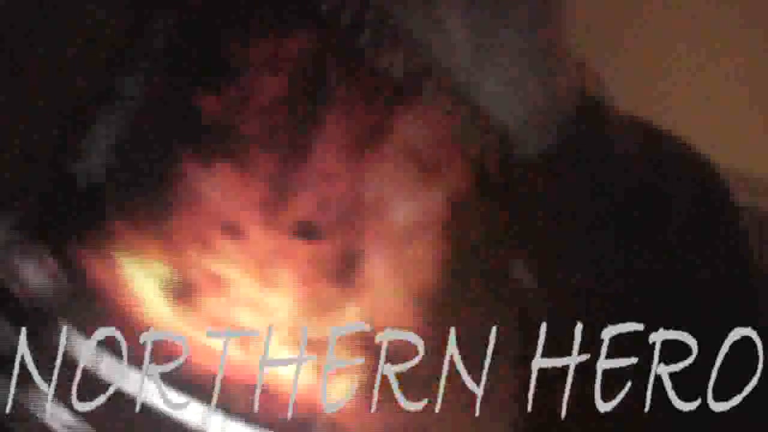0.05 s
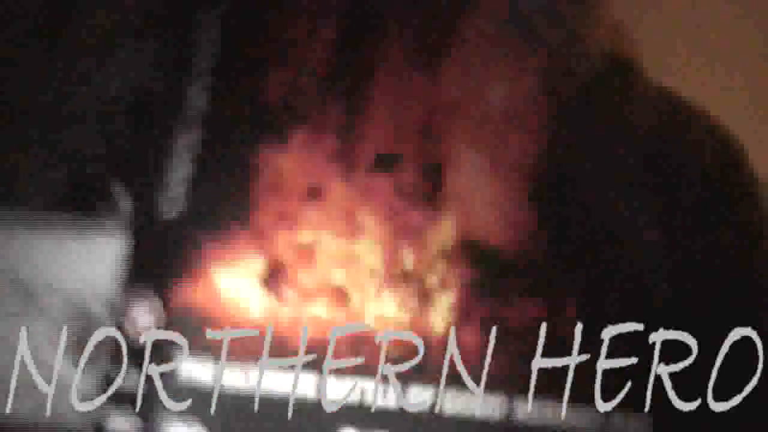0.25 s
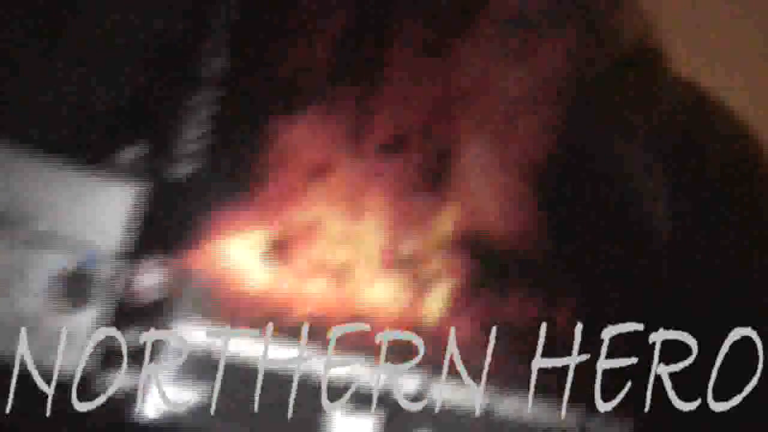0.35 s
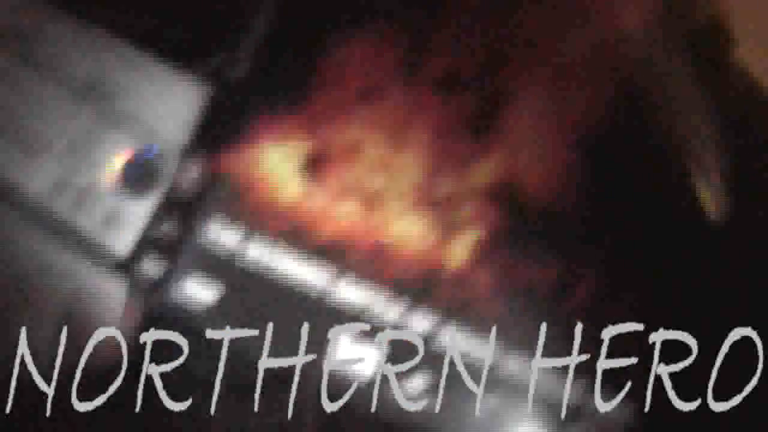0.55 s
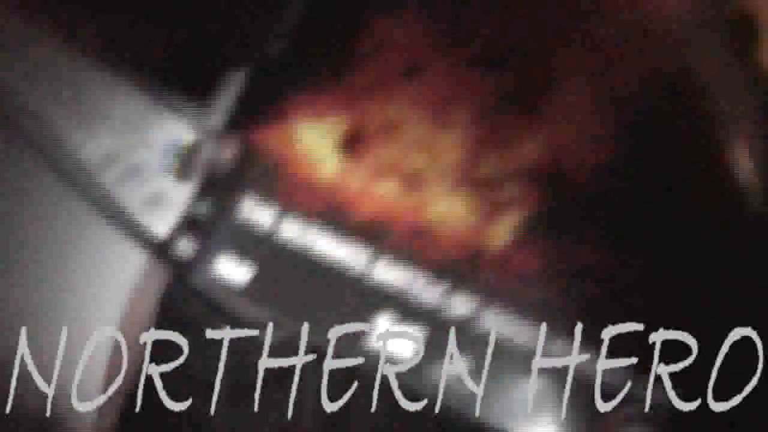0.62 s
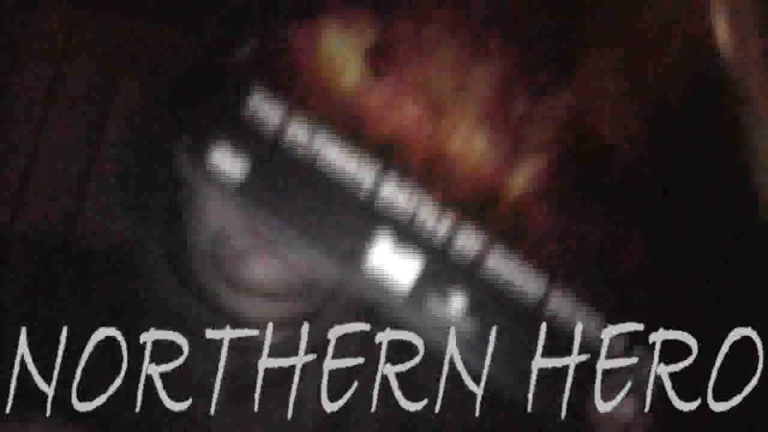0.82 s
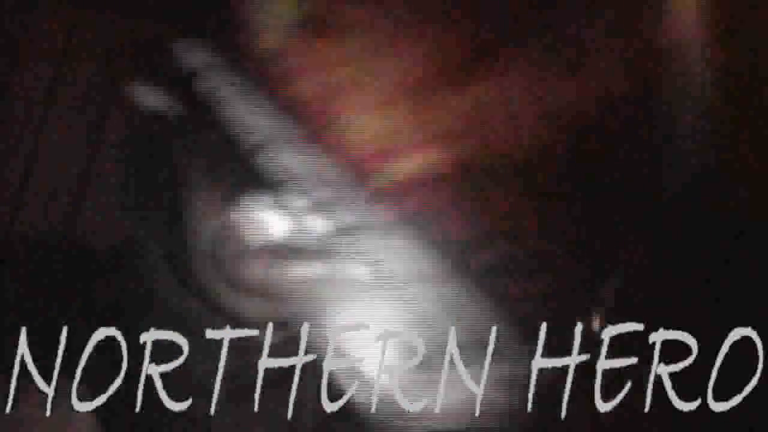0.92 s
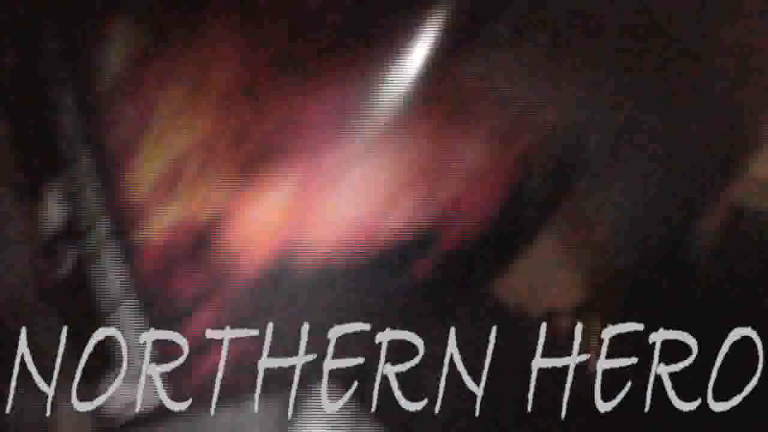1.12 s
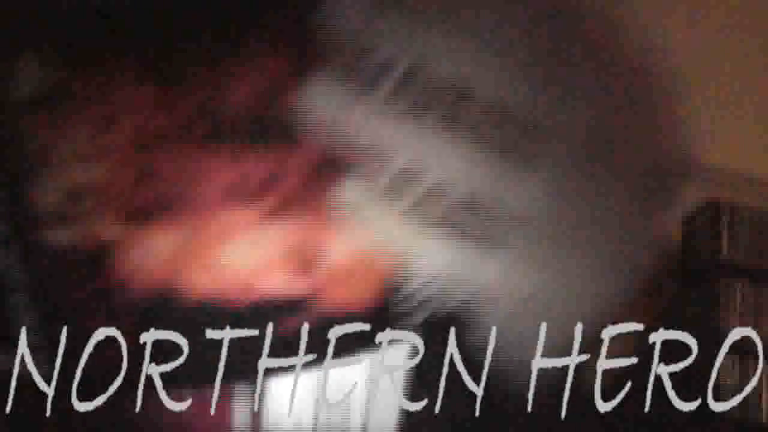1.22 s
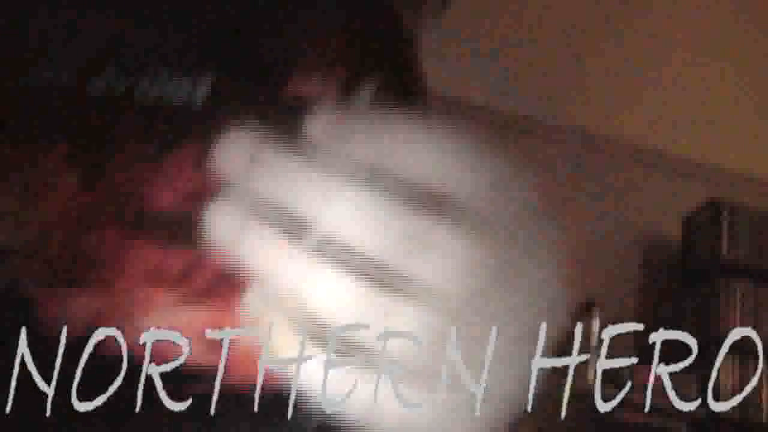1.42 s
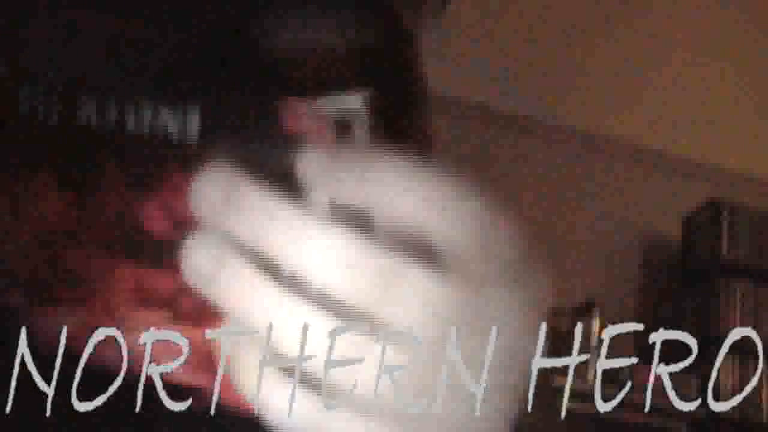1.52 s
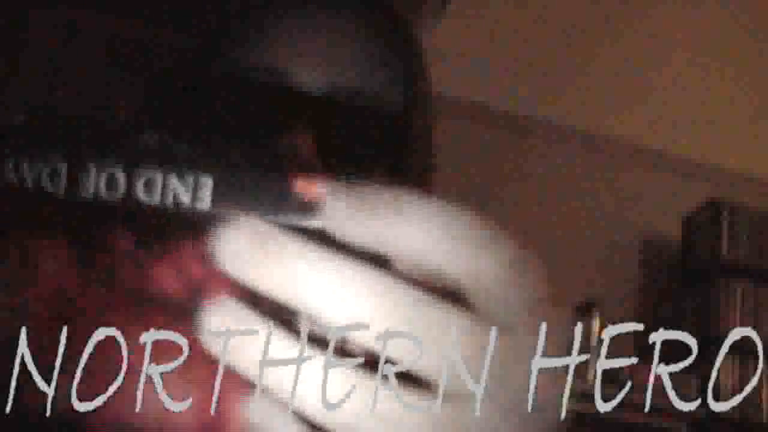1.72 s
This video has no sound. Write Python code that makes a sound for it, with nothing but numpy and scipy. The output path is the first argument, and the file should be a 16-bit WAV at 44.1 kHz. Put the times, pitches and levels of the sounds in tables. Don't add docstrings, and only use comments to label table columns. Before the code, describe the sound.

After a short faint hush, stiff printed paper snaps at its edge and rips in a dense, fluttering crackle; it stops abruptly, and fingers then lightly rub, crease and tap the torn pieces, recorded close indoors.

```python
import sys
import numpy as np
from scipy import signal
from scipy.fft import rfft, irfft, next_fast_len
from scipy.io import wavfile
from scipy.ndimage import uniform_filter1d, map_coordinates

SR = 44100
rng = np.random.default_rng(int(sys.argv[2]) if len(sys.argv) > 2 else 0)


def invert_db(level):
    return 10 ** (np.asarray(level, dtype=float) / 20)


def put_to_file(sound):
    columns = np.atleast_2d(sound).T
    safe = np.clip(columns, -1, 1)
    whole_steps = np.round(safe * 32767)
    wavfile.write(sys.argv[1], SR, whole_steps.astype(np.int16))


N = 77175


def unit(x):
    return x / np.sqrt(np.mean(x ** 2) + 1e-20)


def along(points, hz):
    f, v = np.transpose(points)
    return np.interp(np.log(hz + 1), np.log(f + 1), v)


def wobble(rate):
    knots = rng.standard_normal(int(N / SR * 400) + 4)
    return map_coordinates(knots, [np.arange(N) * min(rate, 399) / SR])


def filtered(x, response):
    m = next_fast_len(len(x) + 8192)
    return irfft(rfft(x, m) * response(np.fft.rfftfreq(m, 1 / SR)), m)[..., :len(x)]


def colour(x, points):
    def response(hz):
        cepstrum = irfft(np.log(invert_db(along(points, hz)) + 1e-6))
        half = len(cepstrum) // 2
        cepstrum[1:half] *= 2
        cepstrum[half + 1:] = 0
        return np.exp(rfft(cepstrum))
    return filtered(x, response)


def band(hz, centre_hz, width):
    return np.exp(-.5 * (np.log((hz + 1) / centre_hz) / width) ** 2)


def ring(x, centre_hz, width_hz):
    def response(f):
        damping = 1j * f * width_hz
        return damping / (centre_hz ** 2 - f * f + damping)
    return filtered(x, response)


def stroke(start, length, edge):
    u = (np.arange(N) / SR - start) / length
    return np.clip(u / edge, 0, 1) * np.clip((1 - u) / 0.058, 0, 1)


def crackle(per_s, spread_db, hiss_db):
    chance, sign, size = rng.random((3, N))
    size_db = np.minimum(-spread_db * np.log(1 - size), 12)
    breaks = (chance < per_s / SR) * np.sign(sign - .5) * invert_db(size_db)
    return unit(unit(breaks) + invert_db(hiss_db) * rng.standard_normal(N))


def rip():
    # time in seconds, pull level in dB.
    pull = [
        (.236, -32.5),
        (.29, -16.5),
        (.35, -20.5),
        (.43, -15.5),
        (.57, -17),
        (.65, -15.5),
        (.72, -16.5),
        (.865, -15),
        (.922, -20),
    ]
    # start in seconds, length in seconds, drop in dB.
    stalls = [
        (.357, .005, 7),
        (.379, .0065, 12),
        (.401, .0075, 13),
        (.694, .012, 4),
        (.847, .004, 7),
    ]
    # centre time in seconds, spread in seconds, strip resonance in Hz, lift in dB.
    flutters = [(0.297, 0.032, 7350, 13.5), (0.306, 0.011, 5150, 9), (0.301, 0.017, 2450, 7.5),
                (0.343, 0.013, 6190, 4), (.34, 0.0075, 3020, 9), (.37, .008, 1650, 1.5),
                (.43, 0.044, 6570, 10), (0.441, 0.016, 1770, 6.5), (.47, .014, 6820, -0.5),
                (.49, 0.047, 3460, 7.5), (.515, 0.016, 1320, 11.5), (0.521, .012, 4750, 8.5),
                (.535, 0.014, 6780, 12.5), (0.556, .018, 3625, 6.5), (.58, 0.0111, 6660, 9),
                (0.619, 0.07, 3570, 7.5), (.625, 0.059, 4560, 6.5), (0.629, 0.016, 7480, 11),
                (0.657, 0.026, 6310, 13.5), (.67, 0.008, 3850, 5), (0.727, 0.016, 4420, 9),
                (.738, 0.02, 3220, 5.5), (.752, 0.012, 5840, 10), (.77, 0.038, 7340, 5.5),
                (.8, 0.03, 1340, 9), (.81, 0.012, 5900, 2.5), (0.831, 0.075, 7230, 6.5),
                (0.853, 0.037, 5200, 9.5), (0.867, 0.0029, 3300, 13.5), (.9, .014, 6100, 11),
                (.912, 0.0072, 4200, 10), (.88, 0.046, 1080, 2.5)]
    # time in seconds, boom of the bent sheet in dB.
    bend = [
        (0.249, -1),
        (.33, 8),
        (.43, 3.5),
        (.52, 5.5),
        (.59, 9),
        (.65, 9.5),
        (0.719, 5),
        (.79, 3.5),
        (.855, -2),
        (.92, 2.5),
    ]
    hz, t, z = signal.stft(fibres(), SR, nperseg=256)
    hz = hz[:, None]
    bend_s, boom_db = np.transpose(bend)
    lift_db = np.interp(t, bend_s, boom_db) / (1 + (hz / 2400) ** 4)
    for at, spread, ring_hz, db in flutters:
        width = .075 * (6000 / ring_hz) ** .5
        lift_db = lift_db + db * band(hz, ring_hz, width) * np.exp(-.5 * ((t - at) / spread) ** 2)
    patches = uniform_filter1d(rng.standard_normal(z.shape), size=5, axis=0)
    patches = 2.2 * unit(uniform_filter1d(patches, size=16, axis=1))
    z = z * invert_db(lift_db + patches)
    slow = np.sqrt(uniform_filter1d(np.sum(abs(z) ** 2, 0), size=9) + 1e-20)
    x = unit(signal.istft(z / slow, SR, nperseg=256)[1][:N])

    t = np.arange(N) / SR
    pull_s, pull_db = np.transpose(pull)
    level_db = np.interp(t, pull_s, pull_db) + 1.6 * wobble(260)
    ease_s, release_s = .004, .045
    for start, length, drop_db in stalls:
        level_db = level_db - drop_db * np.clip((t - start + ease_s) / ease_s, 0, 1) * (t < start + length)
    release = invert_db(-60 * np.clip(t - pull_s[-1], 0, 1) / release_s)
    return x * invert_db(level_db) * (t > pull_s[0]) * release


def fibres():
    # frequency in Hz, fibre spectrum in dB per Hz.
    fibre_spectrum = [(35, -49.5), (60, -33.5), (156, -31.5), (354, -11.5), (501, -13), (1240, -5),
                      (2430, -2), (6300, -0.5), (10600, -13), (13800, -60.5), (22000, -120)]
    grain_hz = [1500, 3700, 6800]

    def breaks():
        return crackle(3600 / 2, 4.5, -7)

    def share(f, hz):
        return band(f, hz, 0.4) / (sum(band(f, h, 0.42) for h in grain_hz) + 1e-30)

    apart = sum(filtered(breaks(), lambda f: np.sqrt(share(f + 300, hz))) for hz in grain_hz)
    return colour(apart + 1.35 * breaks(), fibre_spectrum)


def snaps():
    # start in seconds, peak in dB, low part in dB, decay time T60 in seconds.
    creases = [(.174, -33.5, -24.5, .008), (0.18, -23, -24, 0.011), (0.184, -17.5, -25, 0.032),
               (0.197, -21, -29, 0.0095), (.205, -20.5, -24.5, .006), (0.208, -13, -37, 0.0054),
               (0.2131, -13, -31, 0.039), (0.2255, 0, -20, 0.015), (0.229, 4.5, -17.5, 0.011),
               (.2585, -7, -15.5, .008), (0.299, -11.5, -10, 0.0036), (.343, -16, 0, 0.0055),
               (0.4507, 2.5, -17.5, 0.0062), (.564, -4, -9, .004), (0.65, 2.5, -17, .005),
               (.2505, -37, -16.5, 0.0098), (0.27, -13.5, -15, 0.0063), (0.285, 0.5, -6, .004),
               (0.288, -5, -15, .004), (.321, 0, -1, 0.0049), (.366, -4, -6.5, 0.018),
               (0.3747, 0.5, -37, 0.012), (.386, -2, -16, 0.008), (0.408, -8, -6, 0.011),
               (0.4281, 5, -35, 0.003), (0.4697, 7, -6.5, 0.0018), (0.592, -4.5, -1.5, .003),
               (.76, 5.5, -9.5, 0.0039), (0.867, -1, -16, 0.0214), (.899, -5, -9, 0.016),
               (1.227, -23, -7, 0.012), (1.33, -29, -20, .008), (1.4235, -8.5, -27, .008),
               (1.4272, -26.5, -14, .006), (1.4452, -17.5, -6.5, 0.0039), (1.4467, -16.5, -3, 0.0099),
               (1.511, -32, -15.5, 0.0103), (1.555, -27, -21, .012), (1.475, -20, -8, 0.013),
               (1.728, -34, 2, 0.0048)]
    # frequency in Hz, gain of the bright paper in dB.
    bright = [(1800, -33), (3600, -6.5), (4600, 6), (5600, -1.5), (7300, 0.5), (8500, -9), (10500, -16.5)]
    # frequency in Hz, gain of the thud in dB.
    thud = [(80, -67), (250, -40), (600, -4), (1400, -7), (2600, 4), (3800, -34.5)]
    high, low, t = np.zeros(N + SR), np.zeros(N + SR), np.arange(SR // 8) / SR
    for s, db, low_db, t60 in creases:
        burst = rng.standard_normal(len(t))
        burst[8] = 9 * np.sign(burst[8])
        burst *= invert_db(db - 10 - 60 * t / max(t60, .002)) * (1 - np.exp(-t / 0.00033))
        start = round(s * SR)
        high[start:][:len(t)] += burst
        low[start:][:len(t)] += burst * invert_db(low_db + 7.5)
    return 2 * (colour(high[:N], bright) + colour(low[:N], thud))


def cover():
    # start in seconds, length in seconds, level in dB, resonance in Hz.
    drumming = [
        (0.219, 0.041, -40.5, 720),
        (0.255, 0.01, -32, 690),
        (0.26, 0.014, -30, 668),
        (0.28, 0.029, -28.5, 756),
        (0.301, 0.025, -32.5, 764),
        (0.331, 0.024, -34, 727),
        (0.408, 0.027, -30, 693),
    ]
    x = crackle(1500, 3, 0)
    out = np.zeros(N)
    for s, length, db, hz in drumming:
        width_hz = hz / 4
        drum = unit(ring(ring(x, hz, width_hz), hz, width_hz))
        out += invert_db(db) * stroke(s, length, 0.39) * drum
    return out


def taps():
    # start in seconds, level in dB, decay time T60 in seconds, resonance in Hz.
    touches = [(.2115, -40, .014, 3520), (0.215, -38, .012, 2320), (1.349, -29.5, 0.016, 2170),
               (1.354, -30.5, 0.014, 1800), (1.435, -40, 0.028, 726), (1.453, -33, 0.06, 1213),
               (1.728, -36, 0.015, 2050), (1.2015, -30.5, 0.02, 1290), (1.202, -43.5, 0.085, 582),
               (1.208, -35, 0.04, 1230), (1.316, -46, 0.025, 1775), (1.353, -37, 0.027, 1260),
               (1.389, -41, .02, 1542), (1.445, -22, 0.024, 1310), (1.4461, -20, 0.014, 2060),
               (1.485, -35.5, 0.036, 993), (1.526, -32, 0.025, 960), (1.527, -36, 0.023, 1420),
               (1.692, -30.5, 0.056, 660), (1.693, -38.5, 0.067, 1224), (1.692, -34, 0.034, 341),
               (1.702, -34, 0.048, 733), (1.728, -29, 0.0072, 4015), (1.203, -35, .025, 1627),
               (1.443, -37.5, 0.04, 337), (1.231, -43.5, 0.018, 300), (1.693, -41, 0.018, 1850)]
    rattle_q, rise_s = 3.5, 0.0006
    out, t = np.zeros(N + SR), np.arange(SR // 8) / SR
    for s, db, t60, hz in touches:
        fall = invert_db(db - 0.5 - 60 * t / t60) * (1 - np.exp(-t / rise_s))
        rattle = ring(fall * rng.standard_normal(len(t)), hz, hz / rattle_q)
        rattle = ring(rattle, hz, hz) * np.sqrt(SR * rattle_q / hz)
        tone = ring(fall * np.sin(2 * np.pi * hz * t), hz, hz)
        out[round(s * SR):][:len(t)] += tone + 0.4 * rattle
    return out[:N]


def rub():
    # start in seconds, length in seconds, level in dB, centre of the colour in Hz.
    strokes = [(0.094, 0.076, -60.5, 5800), (.96, .15, -57.5, 6550), (1.231, .012, -42, 6900),
               (1.311, 0.02, -43, 6360), (1.329, 0.017, -41, 6300), (1.345, 0.012, -37.5, 5550),
               (1.351, .03, -48.5, 6500), (1.384, .013, -41, 6300), (1.398, 0.032, -48, 6000),
               (1.416, 0.02, -44, 5400), (1.4205, .0065, -34, 5600), (1.424, 0.0087, -43.5, 6000),
               (1.44, 0.033, -46, 5500), (1.483, .014, -39.5, 5200), (1.498, 0.07, -42.5, 5300),
               (1.55, 0.042, -41, 5410), (1.592, 0.025, -42, 5160), (1.633, 0.051, -46.5, 6620),
               (1.683, .07, -52, 5900)]
    # frequency in Hz, friction spectrum in dB per Hz.
    skin = [(200, -13.5), (700, -0.5), (2000, 2.5), (4500, 0), (7500, -1.5), (8500, -10.5), (10500, -13)]
    x = colour(crackle(2500, 3, 0.0), skin) * invert_db(1.8 * wobble(160))
    out = np.zeros(N)
    for s, length, db, hz in strokes:
        tinted = unit(filtered(x, lambda f: invert_db(8 * band(f, hz, 0.23))))
        out += invert_db(db) * stroke(s, length, .15) * tinted
    return out


def room(x):
    # frequency in Hz, decay time T60 in seconds.
    decay = [(300, 0.57), (2000, 0.2), (6000, 0.28), (10000, .2)]
    out = np.zeros(2 * N)
    for i in range(0, N, 4096):
        hz, t, z = signal.stft(rng.standard_normal(SR // 2), SR, nperseg=256)
        fall = invert_db(-60 * t / along(decay, hz)[:, None])
        tail = signal.istft(z * fall, SR, nperseg=256)[1]
        wet = signal.fftconvolve(x[i:i + 4096], tail / np.linalg.norm(tail))
        out[i + 120:][:len(wet)] += wet
    return out[:N]


def hush():
    # frequency in Hz, background spectrum in dB per Hz.
    quiet = [(15, -89), (25, -52.5), (385, -8), (548, -10), (1140, -10), (1260, -10), (1710, -14.5),
             (6070, -20), (10600, -37.5), (13800, -46), (22000, -120)]
    return invert_db(-54.5 + 0.8 * wobble(8)) * unit(colour(rng.standard_normal(N), quiet))


def scene():
    paper = rip() + cover() + snaps() + taps() + rub()
    return np.tile(paper + invert_db(-12.5) * room(paper) + hush(), (2, 1))


def roll_off(x):
    return signal.sosfilt(signal.butter(12, 11210, fs=SR, output="sos"), x)


def record(dry):
    # frequency in Hz, side over mid in dB.
    side_level = [(30, -7), (130, -27.5), (650, -54.5), (1500, -53.5), (3300, -67), (4500, -22),
                  (7100, -10.5), (8500, -6.5), (9700, -0.5)]
    # frequency in Hz, side phase in radians.
    side_phase = [(100, 2.1), (400, 1.2), (5000, 2.25), (7000, 2.45), (8300, 3.5), (9500, 1.7),
                  (10300, 0.41)]
    # frequency in Hz, unrelated part over the side in dB.
    unrelated = [(100, -3), (5000, -23), (7500, -17.5), (8500, 2), (9700, 7)]
    # frequency in Hz, difference between the ports' self-noise in dB per Hz.
    self_noise = [(18, -71.5), (30, -38), (322, -6), (392, -6.5), (4000, -17.5), (10400, -21), (13500, -64),
                  (22000, -120)]
    top_hz = 10360
    mid = filtered(dry[0], lambda hz: 1 / (1 + (hz / top_hz) ** 160))
    loose = np.real(signal.hilbert(mid) * np.exp(3j * wobble(83)))
    side = filtered(mid, lambda hz: invert_db(along(side_level, hz)) * np.exp(1j * along(side_phase, hz)))
    side = side + filtered(loose, lambda hz: invert_db(along(side_level, hz) + along(unrelated, hz)) * (hz < top_hz))
    noise = unit(colour(rng.standard_normal(N), self_noise))
    side = side + invert_db(-69) * filtered(noise, lambda hz: hz < top_hz)
    return roll_off(np.clip([mid + side, mid - side], -1, 1))


dry = scene()
out = record(dry)
put_to_file(out)
```